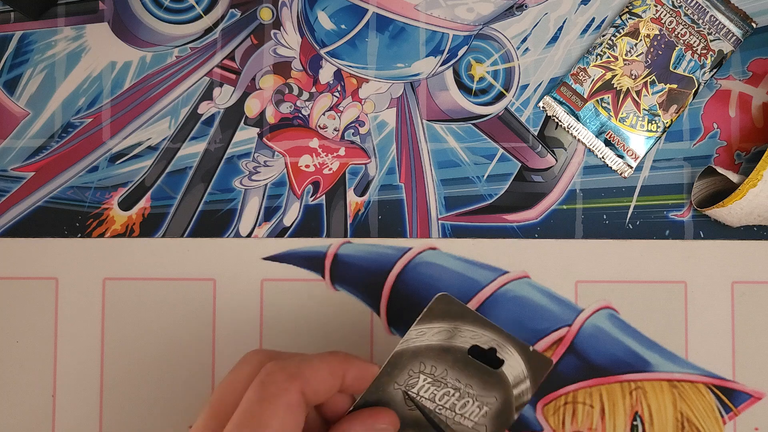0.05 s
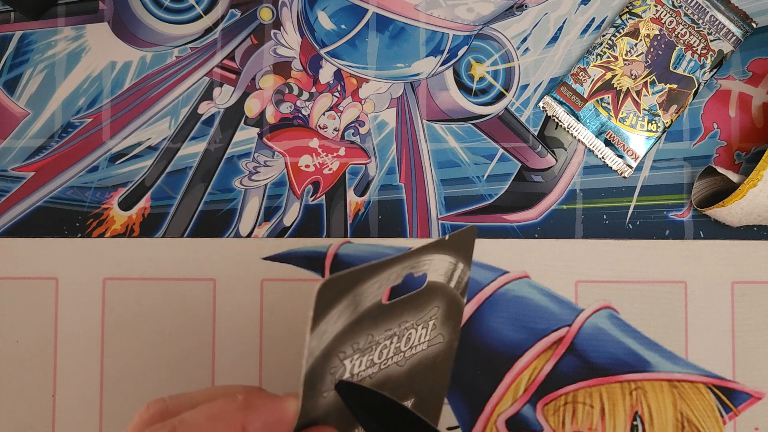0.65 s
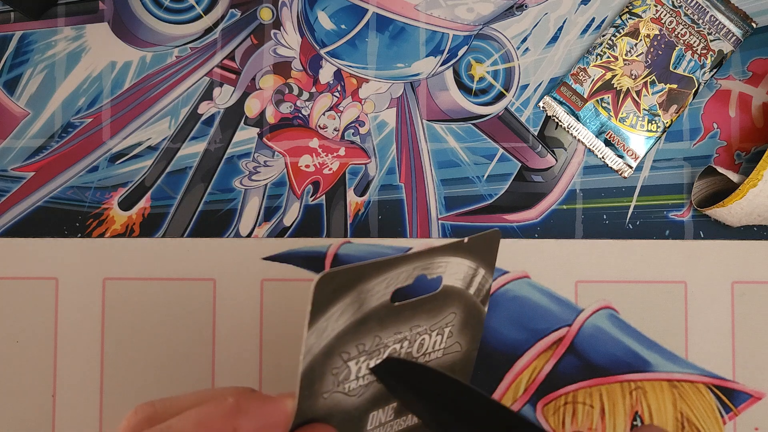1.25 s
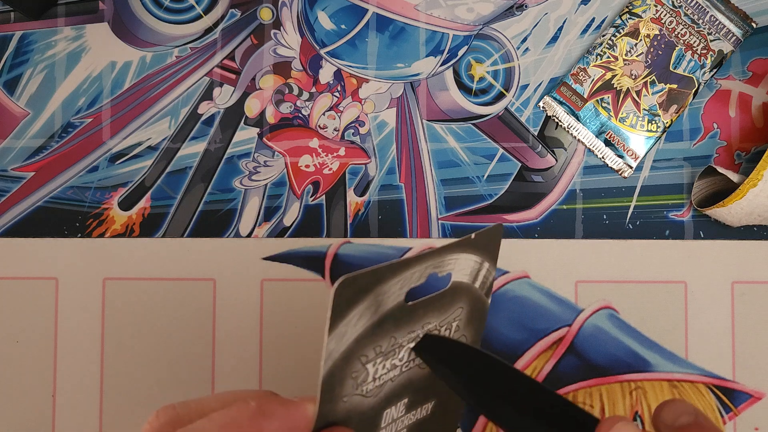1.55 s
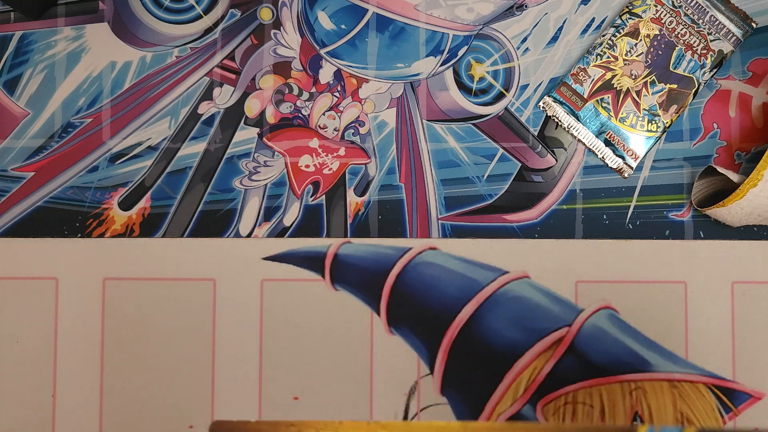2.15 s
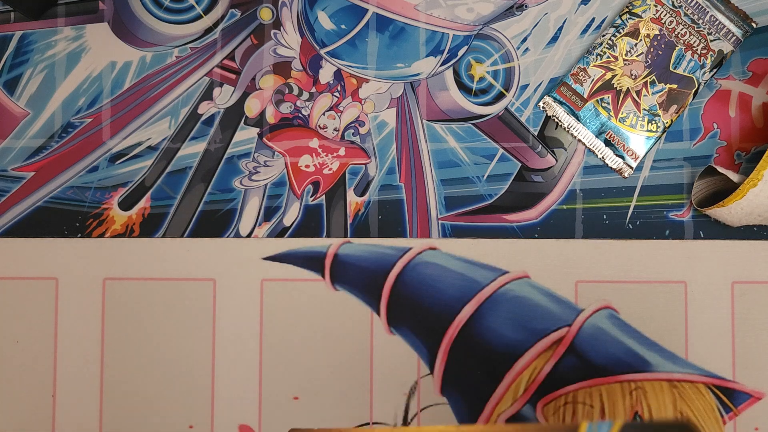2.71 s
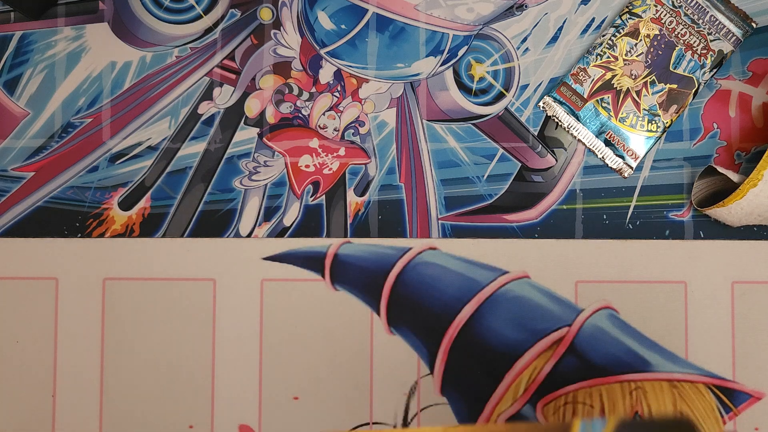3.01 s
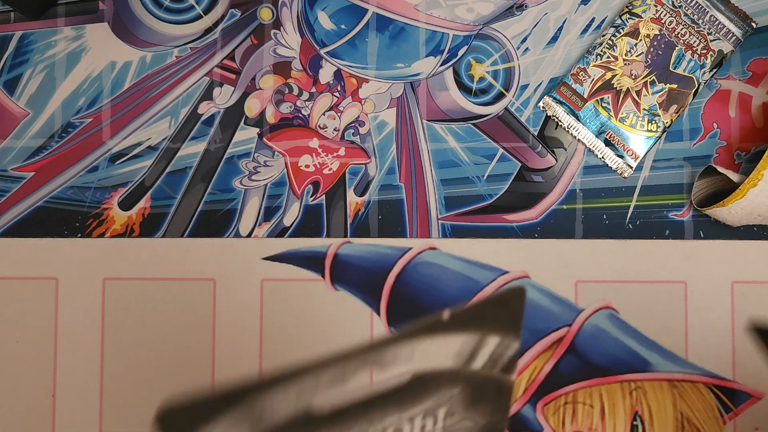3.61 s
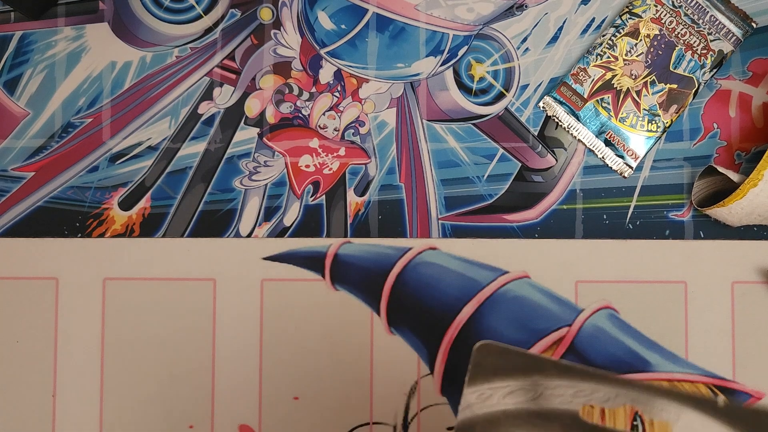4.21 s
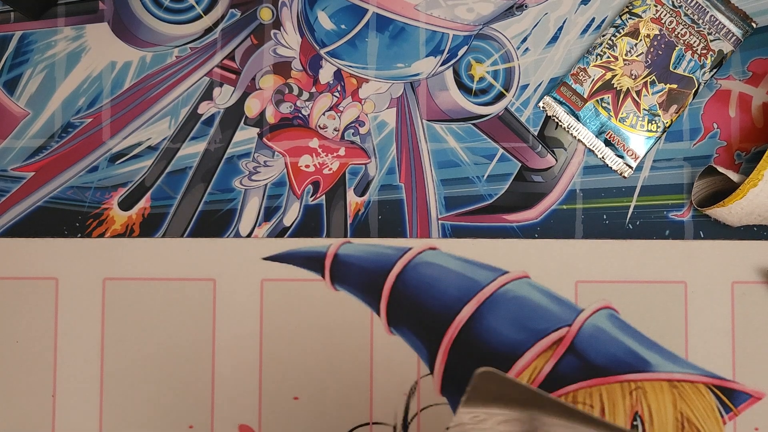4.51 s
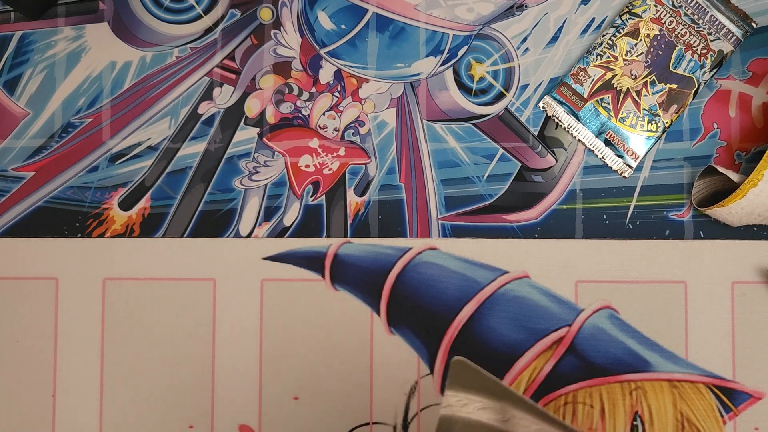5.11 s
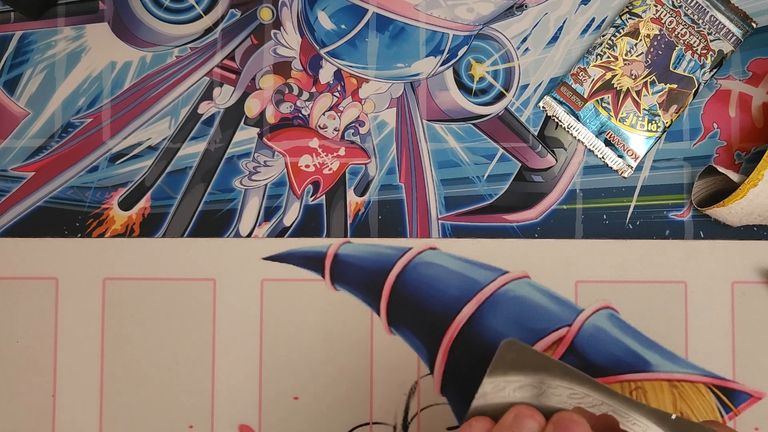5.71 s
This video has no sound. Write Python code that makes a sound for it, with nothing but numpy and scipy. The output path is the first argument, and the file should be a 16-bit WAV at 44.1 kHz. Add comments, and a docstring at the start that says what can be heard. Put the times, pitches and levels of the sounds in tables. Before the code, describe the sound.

A fan hums low and steady in a small room throughout. At the start a serrated knife skips into a plastic blister pack with a short buzz of ticks, then punctures it with hollow cracks around 0.4 and 0.7 seconds. From about 1.1 to 1.8 seconds the blade slices the plastic in one uneven, grainy rasp. A snap and a soft knock come near 2 seconds, followed by faint rubs and a small pop. From 3.1 seconds the backing card scrapes out, ending in a loud hollow knock on a padded table at 3.5. At 4 seconds the knife is laid down with a dull, quick bounce, and another plastic pop follows at 4.2. Fingers then rub and crinkle the empty shell, which snaps sharply at about 5.1 seconds and again near 5.9, with small crackles in between.

```python
"""A short buzz of plastic ticks, then cracks and a long rasp: a serrated knife ratchets into a blister pack,
punctures it and slices it open. The backing card scrapes out and knocks on a padded table, the knife is
laid down with a dull bounce, and the flexed blister snaps twice. The scrapes are stick-slip friction and
the snaps are buckling plastic; plastic pops and lower cardboard knocks ring hollow.
A fan hums throughout in the small room."""
import sys
import numpy as np
from scipy import signal
from scipy.fft import rfft, irfft, next_fast_len
from scipy.io import wavfile
from scipy.ndimage import map_coordinates

SR = 44100
rng = np.random.default_rng(int(sys.argv[2]) if len(sys.argv) > 2 else 0)


def transcribe(signal):
    """Save signal, clipped to [-1, 1], as a 16-bit WAV file at the path in sys.argv[1]."""
    frames = np.atleast_2d(signal).T
    limited = np.clip(frames, -1, 1)
    pcm = np.round(limited * 32767).astype(np.int16)
    wavfile.write(sys.argv[1], SR, pcm)


N = 262642
TIME = np.arange(N) / SR

# The pack's resonances under the blade. Each row: centre in Hz, width in Hz, gain in dB.
PACK_MODES = [(262, 32, -9), (549, 210, -9), (750, 36, 2.5), (830, 76, 4), (1142, 116, -0.5),
              (1451, 116, -4.5), (1738, 92, -5.5), (2104, 98, -5.5), (2820, 470, -13), (3410, 120, -6.5),
              (4270, 410, -12.5), (5830, 470, -6), (6046, 370, -7.5), (6270, 390, -9)]
# The thin blister shell's broad resonances. Each row: centre in Hz, width in Hz, gain in dB.
BLISTER_MODES = [(246, 750, -8), (673.4, 48, -3), (836, 110, -2.5), (1213, 270, 0), (1587, 200, 1.5),
                 (2130, 270, 1.5), (2620, 550, 1), (3326, 960, 1), (4720, 720, 2.5), (5810, 560, 5.5),
                 (6570, 930, -1)]


def amp(db):
    """Decibels to gain."""
    return 10 ** (np.asarray(db) / 20)


def unit(x):
    """x scaled to an rms of 1."""
    return x / np.sqrt(np.mean(x ** 2) + 1e-20)


def along(points, hz):
    """(Hz, value) points read on a log frequency axis."""
    point_hz, values = np.transpose(points)
    return np.interp(np.log(hz + 1), np.log(point_hz + 1), values)


def curves(rows):
    """One automation curve for each column after the time."""
    times, *columns = np.transpose(rows)
    return [np.interp(TIME, times, column) for column in columns]


def wobble(rate):
    """A smooth random curve with rate knots a second."""
    return map_coordinates(rng.standard_normal(int(N * rate / SR) + 4), [TIME * rate])


def filtered(x, response):
    """x shaped by a complex frequency response."""
    n = x.shape[-1]
    padded = next_fast_len(n + 8192)
    hz = np.fft.rfftfreq(padded, 1 / SR)
    return irfft(rfft(x, padded) * response(hz), padded)[..., :n]


def resonate(x, modes):
    """x ringing through a body's resonances, alternating in polarity."""
    def response(hz):
        return sum((-1) ** k * amp(db) * 1j * hz * width / (centre ** 2 - hz ** 2 + 1j * hz * width)
                   for k, (centre, width, db) in enumerate(modes))
    return filtered(x, response)


def band(x, edges_hz, kind, order=3):
    """A causal Butterworth filter."""
    return signal.sosfilt(signal.butter(order, edges_hz, kind, fs=SR, output="sos"), x)


def add(track, start, x):
    """Mix x into track from start, in seconds."""
    part = track[round(start * SR):][:len(x)]
    part += x[:len(part)]


def contact(start, end):
    """Gain of a rubbing contact: it grips quickly, holds, and dies away when the hand lets go."""
    grip_s, release_db_per_s = 0.021, 551
    grip = np.clip((TIME - start) / grip_s + .5, 0, 1)
    return grip * amp(-release_db_per_s * np.maximum(TIME - end, 0))


def strokes(rows):
    """Scrape and body gains of short strokes that swell or fade; the hand's pressure wavers a little."""
    gains = np.zeros((2, N))
    for start, length, scrape_db, body_db, swell_db in rows:
        progress = np.clip((TIME - start) / length, 0, 1)
        envelope = contact(start, start + length) * amp(swell_db * (progress - .5))
        gains += amp([[scrape_db], [scrape_db + body_db]]) * envelope
    return gains * amp(wobble(45))


def long_move(rows, gain_db):
    """Scrape and body gains of one unbroken move that drags unevenly."""
    return amp(np.array(curves(rows)) + gain_db) * contact(rows[0][0], rows[-1][0])


def friction(gains, modes, catches_per_s, spread_db, smooth, judder_db):
    """Stick-slip: uneven catches on a smooth rub shake a sheet, heard as high scrape and low body."""
    catches = rng.random(N) < catches_per_s / SR
    sizes = amp(spread_db * np.minimum(rng.exponential(size=N), 3.5))
    slips = catches * sizes * rng.choice([-1, 1], N)
    force = (unit(slips) + smooth * rng.standard_normal(N)) * amp(judder_db * wobble(220))
    sheet = resonate(force, modes)
    scrape = unit(band(sheet, 2900, "high", order=4))
    body = unit(band(sheet, 2300, "low", order=4))
    return gains[0] * scrape + gains[1] * body


def fan():
    """A four-bladed fan hums, slightly unsteady, over the rumble of the room."""
    # The blade tone's rise and fall. Each row: time in seconds, relative level in dB.
    hum_levels = [(0.0, -56), (0.4, -55), (0.75, -54.5), (1.0, -58), (1.15, -53.5), (1.35, -58.4),
                  (1.55, -51.5), (2.35, -57), (2.65, -47.5), (3.0, -51), (3.15, -61), (3.85, -50),
                  (4.4, -60.9), (4.7, -51.5), (4.85, -59.5), (5.55, -52.5), (5.65, -63.1), (5.95, -58.5)]
    # The fainter tones. Each row: multiple of the shaft speed, relative level in dB.
    shaft_orders = [(2, -63), (6, -73), (8, -83), (12, -73), (16, -83.5)]
    # The rumble's spectrum. Each row: frequency in Hz, relative density in dB.
    rumble_spectrum = [(20, -15), (33, -8.5), (48, 0.5), (78, -7.5), (130, -16.5), (250, -22.5),
                       (420, -38.5), (800, -39.5), (1500, -45.5), (3500, -58), (6000, -47.5), (7500, -58)]
    shaft_hz, blades, hum_gain_db = 25.15, 4, 4
    angle = 2 * np.pi * shaft_hz * TIME + 0.28 * wobble(0.88)
    hum = amp(hum_gain_db + curves(hum_levels)[0] + 1.8 * wobble(4.9)) * np.sin(blades * angle)
    for order, db in shaft_orders:
        hum += amp(db + 4.7 * wobble(10)) * np.sin(order * angle + .5 * wobble(3))
    rumble = unit(filtered(rng.standard_normal(N), lambda hz: amp(along(rumble_spectrum, hz))))
    return np.sqrt(2) * hum + amp(-53.5) * rumble


def blade_drag():
    """Scrape and body gains of the blade: short pushes to get in, then one long slice."""
    # Each row: start and length in seconds, then relative scrape level, body over scrape and swell in dB.
    pushes = [(0, .11, -70, 9, -11), (.13, .045, -74.5, 24, 3.5), (.185, .075, -53.5, 10.5, -6),
              (.28, .07, -57, 8.5, -8.5), (.386, .01, -36.5, 12.5, 1.5), (.405, .025, -62, 9, -7),
              (.44, .1, -70.5, 8, 4.5), (.683, 0.013, -47, 12.5, -15), (.718, 0.028, -32, -0.5, -12),
              (.78, 0.23, -61, -6.5, -7.5)]
    # Each row: time in seconds, relative scrape and body levels in dB.
    long_slice = [(1.125, -44, -38), (1.205, -57, -61.5), (1.375, -50.5, -60), (1.419, -50, -55.5),
                  (1.479, -57.5, -67), (1.501, -46, -56), (1.553, -50.5, -54.5), (1.565, -56.5, -59),
                  (1.669, -44.5, -50), (1.703, -55.5, -60.5), (1.767, -44, -49), (1.805, -50.5, -52.5)]
    return strokes(pushes) + long_move(long_slice, gain_db=7)


def cutting(drag):
    """The blade catches and slips through the plastic with a grainy rasp."""
    return friction(drag, PACK_MODES, catches_per_s=1100, spread_db=3.3, smooth=.55, judder_db=2.3)


def blade_ring(cut):
    """The cut sets the steel ringing, and the ring outlasts each stroke."""
    # The blade's narrow resonances. Each row: centre in Hz, width in Hz, gain in dB.
    steel_modes = [(723, 35, -2), (838, 16, 2.5), (1172, 36, 5.5), (3454, 24, 12), (3530, 25, -2.5),
                   (5280, 100, -2.5)]
    return resonate(cut, steel_modes)


def crinkles(stress):
    """The held sheet keeps relaxing in scattered ticks, faint at rest and louder while it is worked."""
    ticks_per_s, rest_db, stress_gain_db = 45, -52, 18
    ticks = (rng.random(N) < ticks_per_s / SR) * amp(3 * np.minimum(rng.exponential(size=N), 2))
    return resonate(ticks * (amp(rest_db) + amp(stress_gain_db) * stress), BLISTER_MODES)


def ratchet():
    """Teeth skip over the plastic in a buzz of ticks, biting harder as the blade wedges in."""
    # The serrated edge's travel. Each row: time in seconds, teeth that have passed the cut.
    teeth = [(.1, .1), (.1125, 1), (.127, 2), (.182, 7), (.191, 8), (.228, 15), (.2425, 17), (.253, 18),
             (.26, 18.5)]
    bite_db, bite_db_per_s = -22, 116.5
    passed = np.floor(curves(teeth)[0])
    wedged_s = np.clip(TIME, teeth[0][0], teeth[-1][0]) - teeth[0][0]
    ticks = np.diff(passed, prepend=0) * amp(bite_db + bite_db_per_s * wedged_s + rng.normal(0, 2, N))
    crack = band(ticks, [1500, 7000], "band", order=2)
    return .8 * resonate(ticks, PACK_MODES) + .2 * crack


def snaps():
    """The sheet buckles with a kick and a burst that ring the shell: a bright crack over a low knock."""
    # Each row: start in seconds, relative level in dB, brightness in dB per octave,
    # low knock over that level in dB, base t60 in seconds.
    buckles = [(.181, -48, -7.5, 10.5, .025), (.2648, -51.5, 3.5, -28, 0.0058),
               (0.318, -52, 2.5, -24, 0.0033), (0.351, -46.5, -4, -22, 0.048),
               (0.3702, -43.5, -4, -13, 0.017), (.3967, -30, -4, -30, .012), (.421, -45, -6, -31, 0.0071),
               (.515, -56.5, -1, -11, .02), (0.6743, -47.5, 9, 2, .03), (0.7056, -42.5, -7.5, -10, 0.011),
               (.7303, -49.5, -18, 9.5, 0.066), (.7482, -37, -4, -17, 0.0048), (1.113, -43.5, 6.5, 1, 0.1),
               (2.0499, -29.5, 1, -2, 0.012), (2.094, -42.5, -5, 5, 0.017), (2.1562, -52, 3, 1, 0.0095),
               (2.328, -67, 2, -8, .021), (2.413, -73.5, 1.5, -9, .02), (2.512, -73, 3.5, -10.5, 0.013),
               (2.639, -48, 4, 11.5, 0.1), (2.7173, -45, -5.5, 1, 0.012), (3.4792, -20.5, -6, 5.5, 0.011),
               (3.495, -35, -3, 2.5, .025), (3.5291, -45.5, -2.5, -14, 0.0059),
               (3.5925, -39, -2, -25, 0.014), (3.606, -41, -4, 0, 0.017), (3.6545, -36, 0, -8, 0.011),
               (3.8272, -60, 2, -6, 0.018), (4.185, -46, -3.5, -25, 0.024),
               (4.2166, -33.5, -3, 0.5, 0.0042), (4.2336, -37.5, 1.5, 1, 0.03),
               (4.278, -43.5, -1.5, -8, 0.017), (4.295, -47, -1, 4.5, 0.0039),
               (4.848, -65, 3.5, 12.5, 0.047), (5.1375, -37.5, -6, -16, 0.023),
               (5.1425, -17, 3, -11.5, 0.01), (5.3359, -44, 4, 2.5, 0.014), (5.3538, -45, 1, -21, 0.032),
               (5.365, -48.5, 4, -22, 0.031), (5.3951, -43.5, -3, -27, 0.019),
               (5.493, -53, -3, -19.5, 0.022), (5.5794, -61, 4.5, -10.5, 0.029),
               (5.8688, -27, -1.5, -33, 0.0078), (5.876, -28.5, -3.5, -18, 0.014)]
    # A snap's four bands, knock first. Each row: low and high edge in Hz, t60 multiplier, gain in dB.
    registers = [(151, 500, 0.81, -6), (506, 1355, 1.1, -5.5), (1270, 3580, 2.9, 0), (5060, 7900, .6, -2)]
    pivot_hz, attack_samples = 2160, SR // 100  # brightness tilts the upper bands about the pivot
    octaves = np.log2([np.sqrt(lo * hi) / pivot_hz for lo, hi, *_ in registers[1:]])
    out = np.zeros(N)
    t = np.arange(SR // 6) / SR
    for start, db, tilt_db, knock_db, t60 in buckles:
        levels_db = db + np.append(knock_db, tilt_db * octaves)
        for level_db, (lo_hz, hi_hz, ring, gain_db) in zip(levels_db, registers):
            burst = rng.standard_normal(len(t)) * amp(-60 * t / (t60 * ring))
            burst[0] += 0.81 * np.linalg.norm(burst)  # the kick
            crack = band(resonate(burst, BLISTER_MODES) + 0.14 * burst, [lo_hz, hi_hz], "band")
            attack_rms = np.sqrt(np.mean(crack[:attack_samples] ** 2))
            add(out, start, amp(level_db + gain_db) * crack / attack_rms)
    return out


def pops_and_knocks():
    """Plastic pops and lower cardboard knocks ring hollow, each at its own pitch, with a slight flutter."""
    # Each row: start in seconds, relative level in dB, pitch ratio.
    hits = [(0.3971, -33, 0.67), (0.407, -40, 0.46), (.4215, -42, 0.61), (0.7199, -35, .53),
            (0.7293, -43, .97), (0.7496, -37.5, .58), (2.0502, -30.5, .58), (2.6387, -42, .64),
            (2.7172, -48, .61), (3.479, -18, .73), (3.826, -48.5, .63), (4.235, -30, .58),
            (5.1434, -21.5, 1.3), (5.1469, -31, 1.9), (5.3353, -44.5, 0.66), (5.3555, -39.5, 0.97),
            (5.3953, -49.5, 1.3), (5.493, -44, 0.68), (5.8683, -29.5, 1.7), (5.8763, -21, 1.0)]
    # The pack's hollow ring. Each row: base frequency in Hz, gain in dB, t60 in seconds.
    hollow_modes = [(791.5, -12.5, 0.08), (1204, -5, 0.11), (1378, 3, 0.065), (1360, -5.5, 0.075),
                    (1926, -22, 0.41), (2470, -3.5, 0.074), (3020, -14.5, 0.054)]
    out = np.zeros(N)
    t = np.arange(SR // 4) / SR
    for start, db, pitch_ratio in hits:
        for hz, mode_db, t60 in hollow_modes:
            flutter = 0.079 * np.cumsum(rng.standard_normal(len(t)))
            ring = np.sin(2 * np.pi * hz * pitch_ratio * t + flutter)
            add(out, start, amp(db + mode_db - 60 * t / t60) * ring)
    return out


def card_slide():
    """The card rubs on the plastic with a fine hiss: short shifts, and one pull out of its sleeve."""
    # Each row: start and length in seconds, then relative scrape level, body over scrape and swell in dB.
    shifts = [(1.955, 0.077, -49.5, 6, 7.5), (2.058, 0.033, -50, 5, -18), (2.12, 0.039, -55, 2, 1),
              (2.2, .1, -74.5, 2.5, -10), (2.575, 0.034, -63, -16, 5), (2.64, .125, -60.5, 5, -5.5),
              (3.03, 0.062, -68.5, -2.5, -12), (3.6, 0.075, -57.5, -3, -5), (3.708, 0.012, -51, 7, -3.5),
              (3.74, 0.14, -76.5, 6, -8)]
    # Each row: time in seconds, relative scrape and body levels in dB.
    pull = [(3.105, -68.5, -67), (3.183, -55.5, -53.5), (3.249, -51, -60.5), (3.313, -37, -43.5),
            (3.373, -60, -69.5), (3.413, -54, -62.5), (3.445, -38.5, -44), (3.47, -33, -37)]
    # The sliding card's resonances. Each row: centre in Hz, width in Hz, gain in dB.
    card_modes = [(430, 64, -11.5), (854, 55, 2.5), (1157, 38, 0.5), (1925, 410, -4.5), (2830, 160, -3.5),
                  (3170, 190, -5), (4450, 530, -1.5), (5140, 110, 1.5), (5940, 140, 1), (6800, 110, -10)]
    drag = strokes(shifts) + long_move(pull, gain_db=7.5)
    return friction(drag, card_modes, catches_per_s=3400, spread_db=-0.5, smooth=1.0, judder_db=3.0)


def table_thuds(knife_blows):
    """A push and a short rattle drive the table; soft contacts are dull, heavy ones sway the whole top."""
    # Each row: start in seconds, peak in dB, contact cut-off in Hz, rattle t60 in seconds, sway in dB.
    soft_blows = [(2.05, -34, 300, .14, -61.5), (2.093, -37, 215, .14, -48.5),
                  (3.4785, -18.5, 611, .022, -17), (3.497, -33.5, 250, .05, -38.5),
                  (3.9714, -15.5, 190, .03, -41), (4.231, -35, 250, .14, -31.5),
                  (5.154, -45, 197, .03, -28.5)]
    # The padded table's resonances. Each row: centre in Hz, width in Hz, gain in dB.
    table_modes = [(124.6, 88, -3), (171, 43, 5), (242, 25, -3.5), (308, 24, -1), (430, 46, -3),
                   (560, 48, -1.5), (720, 270, -12.5)]
    sway_hz, sway_t60, sway_rise_s = 74, .085, 0.00047
    out = np.zeros(N)
    t = np.arange(SR // 3) / SR
    sway = np.sin(2 * np.pi * sway_hz * t) * amp(-60 * t / sway_t60) * (1 - np.exp(-t / sway_rise_s))
    for start, db, contact_hz, t60, sway_db in soft_blows + knife_blows:
        force = 0.053 * rng.standard_normal(len(t)) * amp(-60 * t / t60)
        force[0] += 1  # the push
        blow = band(resonate(force, table_modes), contact_hz, "low")
        add(out, start, amp(db) * blow / np.abs(blow).max() + amp(sway_db) * sway)
    return out


def finger_drag():
    """Scrape and body gains of the fingers working the empty blister."""
    # Each row: start and length in seconds, then relative scrape level, body over scrape and swell in dB.
    rubs = [(3.89, 0.12, -62, -2.5, 4.5), (4.005, 0.11, -58.5, -1, -23), (4.21, 0.023, -41, 8, 0),
            (4.295, .14, -57, 0, -6), (4.58, 0.14, -50, -6.5, -2.5), (4.762, 0.013, -51.5, -1, -5),
            (4.847, 0.049, -59, -4, 15), (4.96, 0.2, -74, -6.5, 8), (5.131, 0.064, -37, 0, -5),
            (5.22, 0.095, -51.5, -1.5, 11), (5.335, 0.11, -53.5, -2, -4), (5.455, 0.061, -50.5, 1.5, 2.5),
            (5.56, 0.41, -60.5, -3, 6), (5.89, 0.057, -52.5, 12.5, -5)]
    return strokes(rubs)


def rubbing(drag):
    """Fingers stick and slip on the blister and set its shell rustling."""
    return friction(drag, BLISTER_MODES, catches_per_s=1200, spread_db=2.5, smooth=1.0, judder_db=2.0)


def knife_bounces(count):
    """Blows for the table as each end of the knife bounces: sooner, weaker and duller every time."""
    # The two ends landing. Each row: start in seconds, peak in dB, contact cut-off in Hz.
    landings = [(4.005, -17, 606), (4.024, -22, 780)]
    first_flight_s, rattle_t60, sway_over_peak_db = 0.036, 0.11, -23.5
    shrink, loss_db, soften = .93, 5, 0.96  # per bounce
    blows = []
    for start, db, contact_hz in landings:
        for k in range(count):
            peak_db = db - loss_db * k
            blows.append((start, peak_db, contact_hz * soften ** k, rattle_t60, peak_db + sway_over_peak_db))
            start += first_flight_s * shrink ** k
    return blows


def room(x):
    """The walls answer after a few milliseconds, each frequency dying at its own speed."""
    # Each row: frequency in Hz, t60 in seconds.
    decay_times = [(150, .35), (1000, 0.29), (3000, 0.31), (7000, 0.2)]
    build_up_s = 0.0069
    hz, t, spectrum = signal.stft(rng.standard_normal(SR // 2), SR, nperseg=256)
    decay = amp(-60 * t / along(decay_times, hz)[:, None])
    tail = signal.istft(spectrum * decay, SR, nperseg=256)[1]
    tail *= 1 - np.exp(-(np.arange(len(tail)) / SR / build_up_s) ** 2)
    return signal.fftconvolve(x, tail / np.linalg.norm(tail))[:N]


def scene():
    """All sources reach one microphone, alike in both channels."""
    blade, fingers = blade_drag(), finger_drag()
    cut = cutting(blade) + ratchet()
    scrapes = cut + card_slide() + rubbing(fingers)
    pack = amp(-3.0) * scrapes + pops_and_knocks() + crinkles(stress=fingers[0] + blade[0])
    steel = amp(-7.5) * blade_ring(cut)
    cracks = snaps()
    thuds = table_thuds(knife_bounces(count=4))
    walls = room(amp(-20) * cracks + amp(-15.5) * (pack + steel) + amp(-11.5) * thuds)
    mono = pack + steel + cracks + thuds + walls + fan()
    return np.array([mono, mono])


def record(dry):
    """A narrow-band microphone with a faint hiss of its own; the hardest peaks are softly rounded off."""
    # Each row: frequency in Hz, gain in dB.
    mic_response = [(15, -22.5), (28, -10), (45, -3.5), (6700, -4), (7100, -6.5), (7650, -16), (8300, -48),
                    (9500, -77)]
    ceiling, top_hz = 1.5, 15700
    squashed = dry / (1 + (dry / ceiling) ** 4) ** .25
    heard = filtered(squashed, lambda hz: amp(along(mic_response, hz)))
    hiss = amp(-84.0) * rng.standard_normal(dry.shape)
    return filtered(heard + hiss, lambda hz: hz < top_hz)


dry = scene()
out = record(dry)
transcribe(out)
```